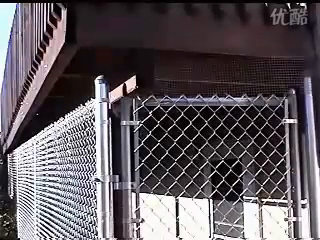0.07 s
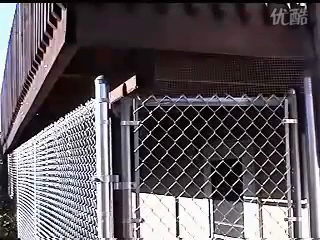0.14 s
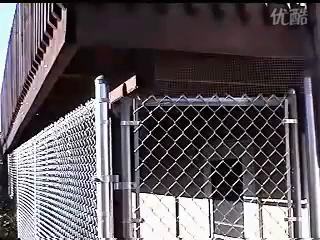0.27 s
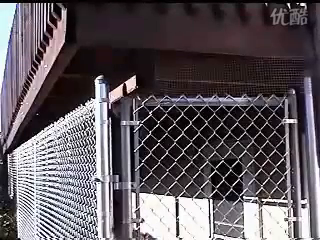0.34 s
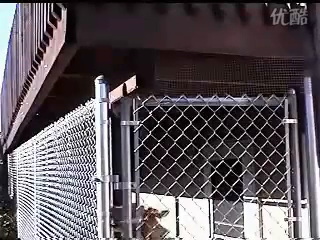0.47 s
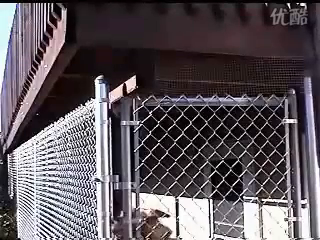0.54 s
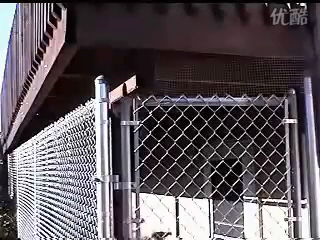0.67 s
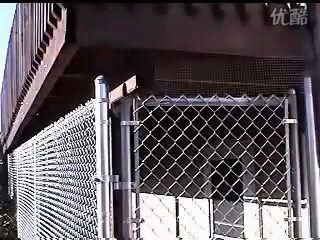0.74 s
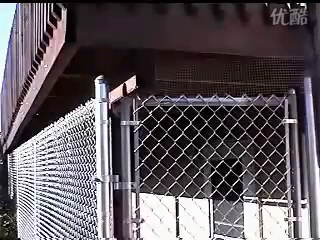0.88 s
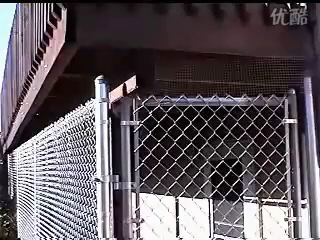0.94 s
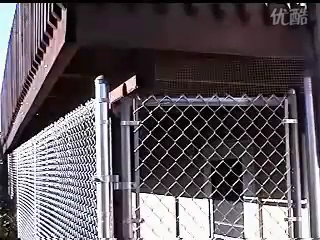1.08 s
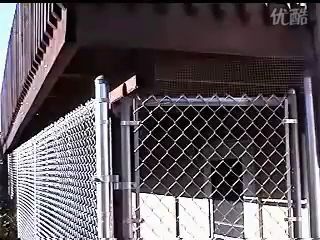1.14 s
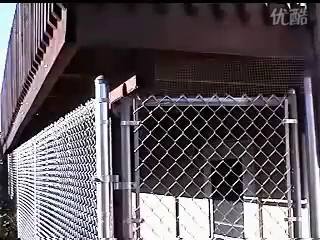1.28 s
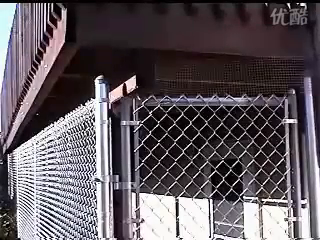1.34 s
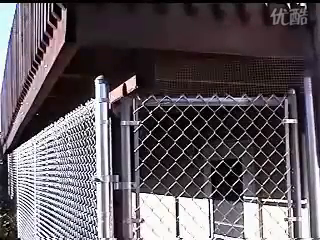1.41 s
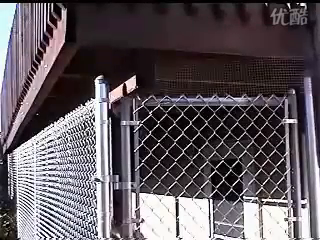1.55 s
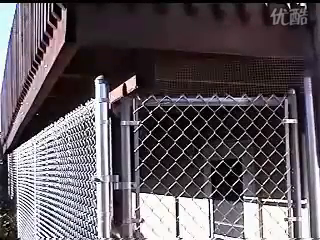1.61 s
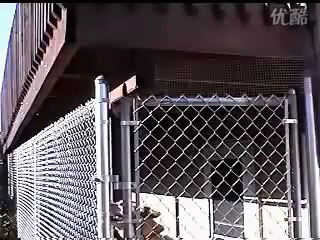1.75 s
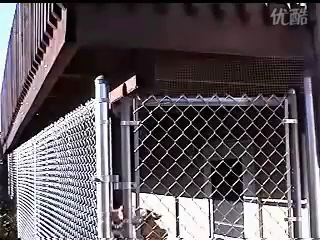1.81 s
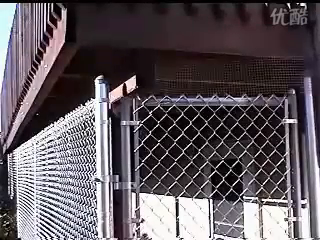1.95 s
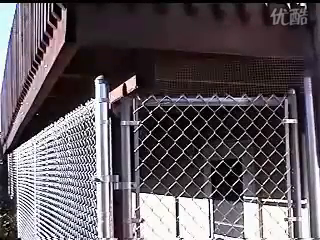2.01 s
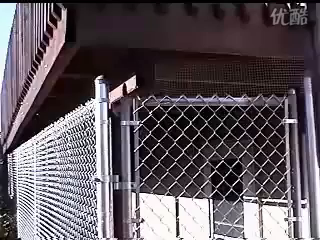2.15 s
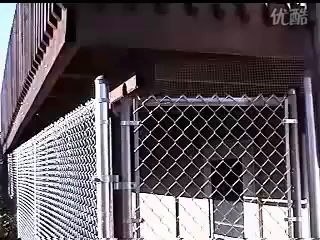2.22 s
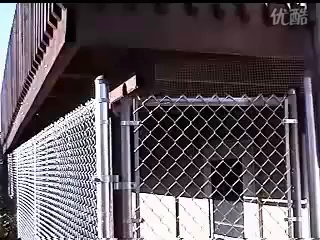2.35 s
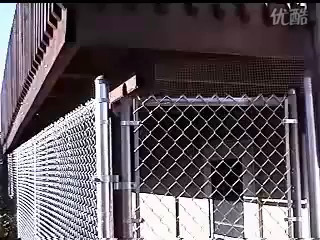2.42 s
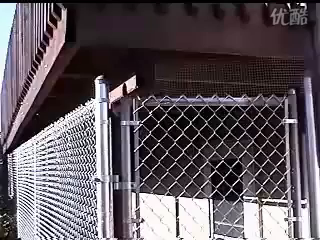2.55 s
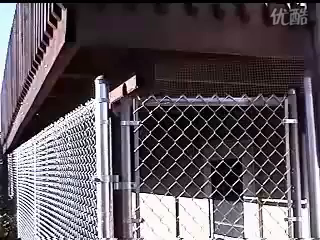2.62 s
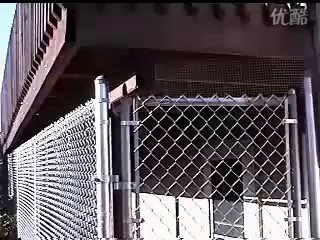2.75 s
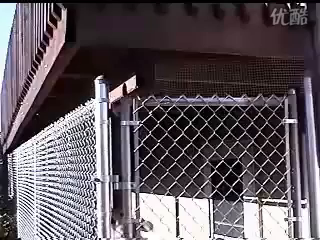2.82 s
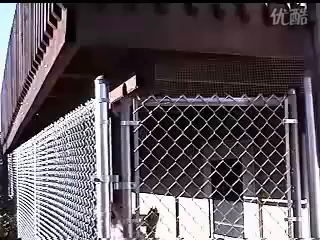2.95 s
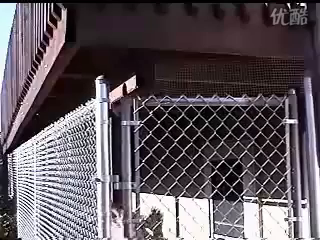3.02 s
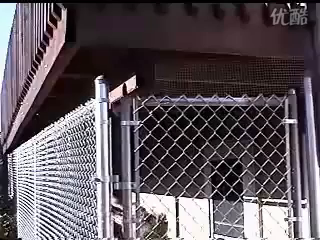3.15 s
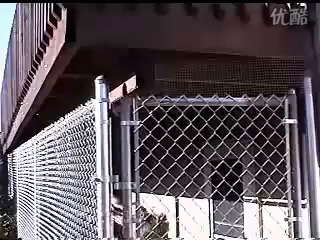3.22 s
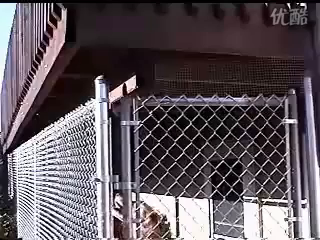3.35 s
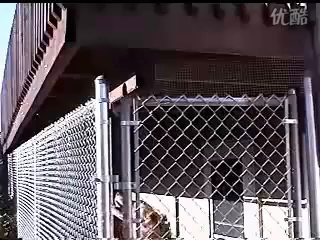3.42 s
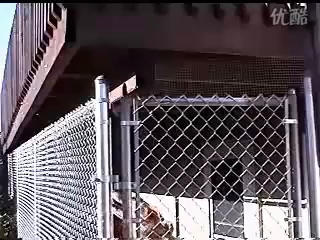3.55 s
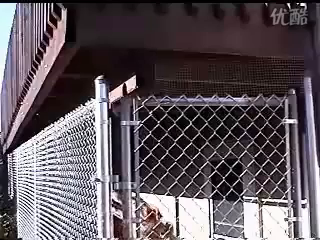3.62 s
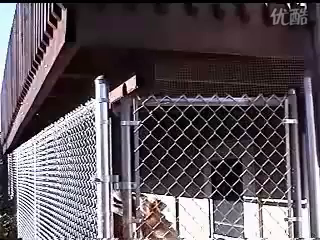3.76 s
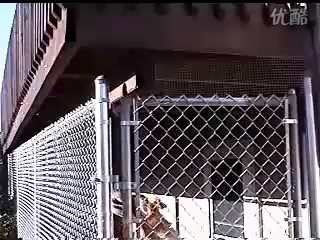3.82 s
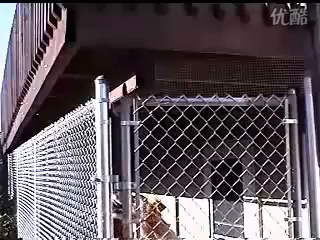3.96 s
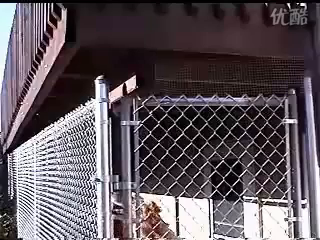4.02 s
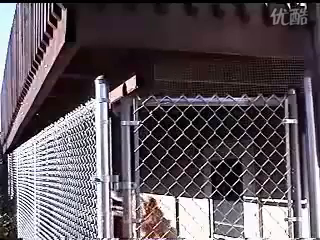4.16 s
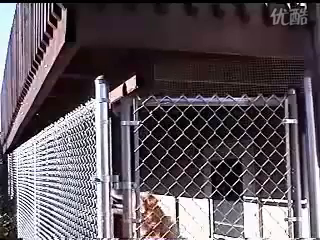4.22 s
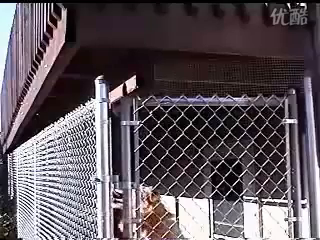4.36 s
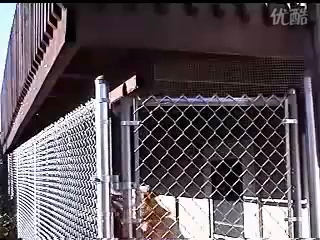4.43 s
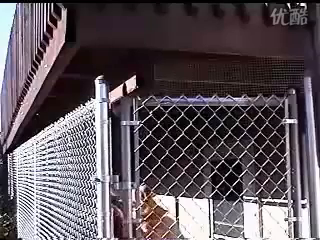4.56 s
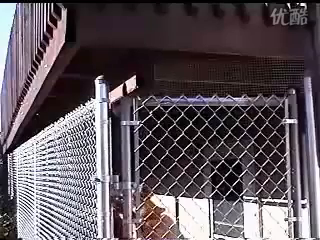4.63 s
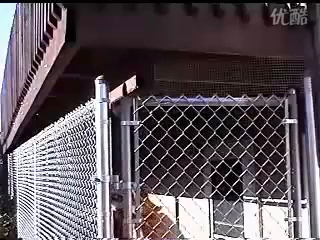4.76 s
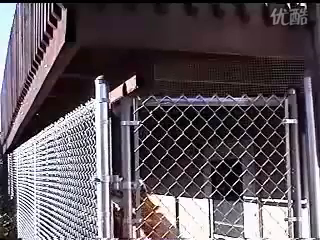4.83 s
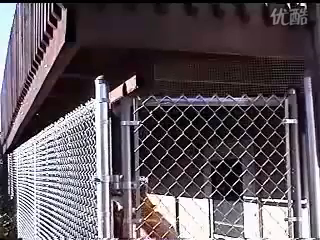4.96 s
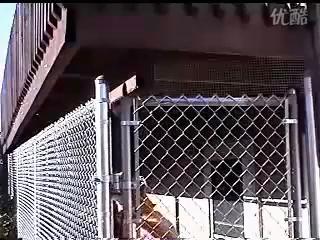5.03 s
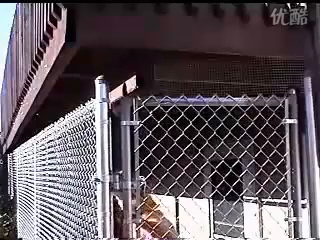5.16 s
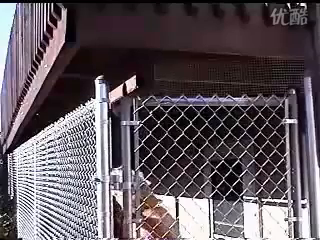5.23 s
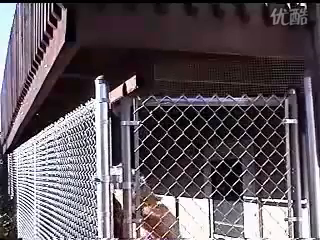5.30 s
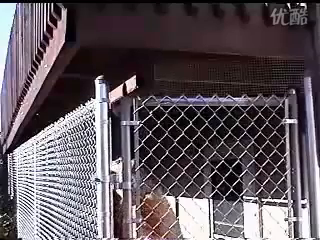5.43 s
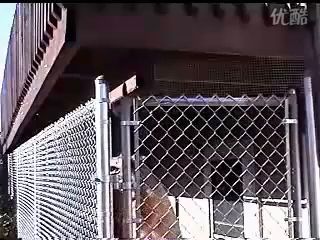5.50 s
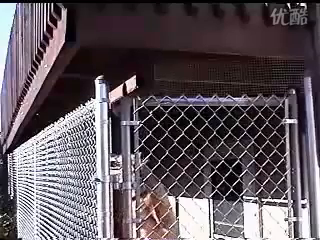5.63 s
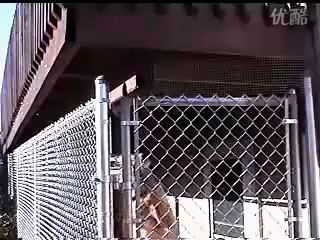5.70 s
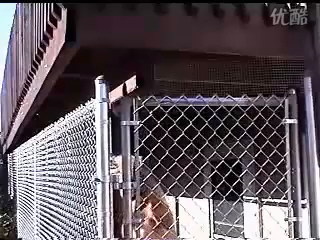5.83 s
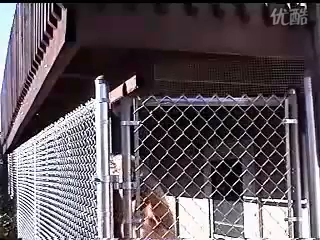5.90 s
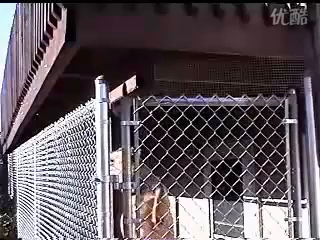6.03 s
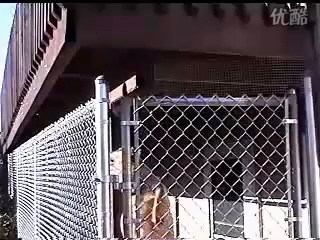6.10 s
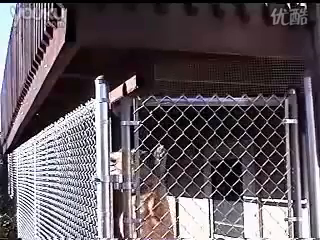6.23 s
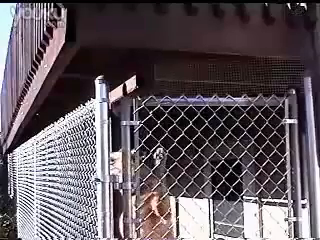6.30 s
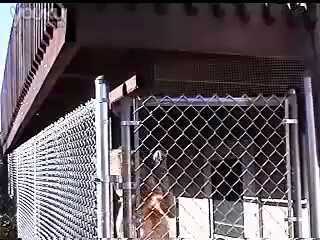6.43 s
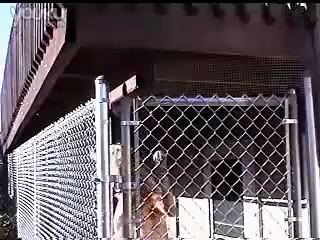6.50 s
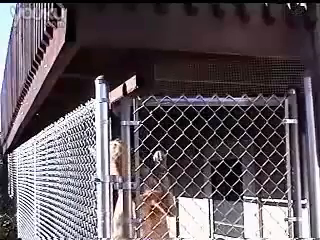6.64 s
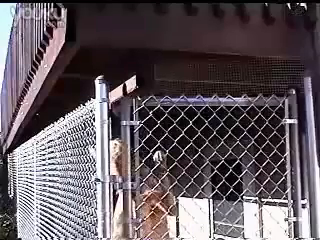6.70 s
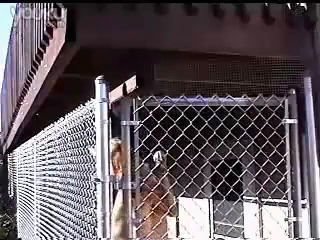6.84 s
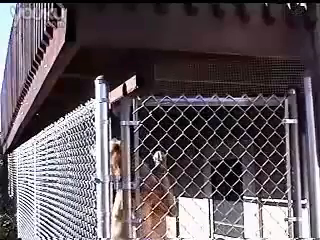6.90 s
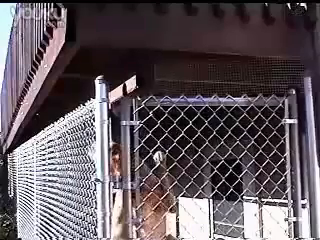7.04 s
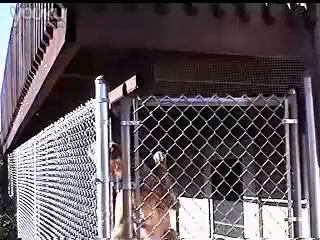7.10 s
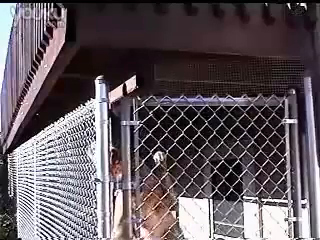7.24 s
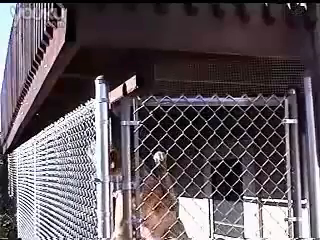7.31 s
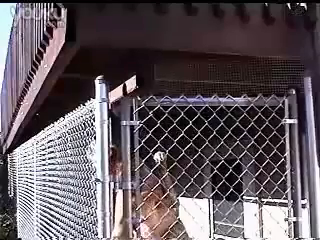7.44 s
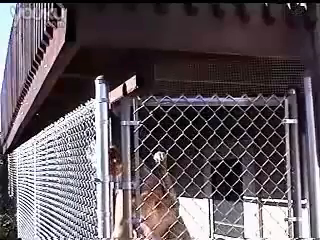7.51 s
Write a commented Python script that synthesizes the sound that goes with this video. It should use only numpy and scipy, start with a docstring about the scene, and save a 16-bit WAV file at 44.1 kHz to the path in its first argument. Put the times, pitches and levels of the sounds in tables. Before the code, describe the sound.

Loose wire mesh jangles in irregular bursts as an animal jumps at and then scrambles up a metal gate in an open-air kennel. Noisy steel crashes carry short metallic rings and occasional gliding knocks through the pipes. Early hits are separated by quieter hiss; later ones overlap in nearly continuous rattling. A rough microphone adds constant hiss, shifting low rumble, dull top end and clipped peaks.

```python
"""A loud hiss runs throughout, drifting a few dB, over a low rumble that swells as the gate shakes.
From 0.2 s a dog climbs a chain-link gate: paw shoves rattle the mesh, a blur of tiny link taps.
From 0.2 s latch, frame and hinge also clank: damped steel modes, each with a noise crash from the wires.
From 1.1 s a few pushes thump through the pipes as short gliding tones; clanks go on to 7.4 s.
The sum is band-limited; its loudest peaks clip."""
import sys
import numpy as np
from scipy import signal
from scipy.fft import rfft, irfft, next_fast_len
from scipy.io import wavfile
from scipy.ndimage import uniform_filter1d, map_coordinates

SR = 44100
rng = np.random.default_rng(int(sys.argv[2]) if len(sys.argv) > 2 else 0)


def generate_wav(signal):
    """Clip the signal to [-1, 1] and save it as 16-bit WAV at the path in sys.argv[1]."""
    frames = np.transpose(np.atleast_2d(signal))
    scaled = np.clip(frames, -1, 1) * 32767
    pcm = np.round(scaled).astype(np.int16)
    wavfile.write(sys.argv[1], SR, pcm)


N = 333837  # samples


def amp(db):
    """Linear gain of a level in dB."""
    return 10 ** (np.asarray(db) / 20)


def unit(x):
    """Scale x to rms 1."""
    return x / np.sqrt(np.mean(x ** 2) + 1e-20)


def along(points, hz):
    """Interpolate (f/Hz, value) points on a log-frequency axis."""
    f, v = np.transpose(points)
    return np.interp(np.log(hz + 1), np.log(f + 1), v)


def curves(rows):
    """Interpolate each column after t/s to one value per sample."""
    s, *cols = np.transpose(rows)
    return [np.interp(np.arange(N) / SR, s, c) for c in cols]


def filtered(x, response):
    """Zero-phase filter: spectrum of x times response(hz)."""
    m = next_fast_len(N + SR // 2)
    return irfft(rfft(x, m) * response(np.fft.rfftfreq(m, 1 / SR)), m)[..., :N]


def stereo(pair, alike):
    """Mix two unrelated signals to left/right with the given correlation per frequency."""
    def mid_side_gains(hz):
        angle = np.arccos(np.clip(along(alike, hz), -1, 1)) / 2
        return np.array([np.cos(angle), np.sin(angle)])
    mid, side = filtered(pair, mid_side_gains)
    return np.array([mid + side, mid - side])


def patchy(pair, patchy_db):
    """Random smooth gain patches over time and frequency, patchy_db rms, shared by both channels."""
    z = signal.stft(pair, nperseg=512)[2]
    field = rng.standard_normal(z.shape[1:])
    field = uniform_filter1d(field, size=5, axis=0)
    field = uniform_filter1d(field, size=8, axis=1)
    return signal.istft(z * amp(patchy_db * unit(field)), nperseg=512)[1][:, :N]


def wobble(rate_hz):
    """Smooth random curve through rate_hz knots per second."""
    knots = rng.standard_normal(int(N * rate_hz / SR) + 4)
    return map_coordinates(knots, [np.arange(N) * rate_hz / SR])


# lasting mesh motion under the dog's weight, relative levels:
# [t/s, rattle level/dB, slack low wires re rattle/dB, tight high links re rattle/dB]
MESH_JIGGLE = [(0, -23, 4, 0), (.17, -22, 3, 0), (.45, -29, 5, -14), (.95, -22, -9, -4), (1.2, -36, 3, -12),
               (1.62, -33, 3, -14), (1.98, -18.5, 5, 2), (2.52, -22.5, 3, 1), (2.88, -27, 0, -5),
               (3.8, -20, 1, 2), (4.42, -27, 6, -1), (4.8, -30, 5, 3), (5.08, -29, 6, -1),
               (5.6, -18, -1, 1), (6.1, -21, -1, 3), (6.95, -17.5, 3.5, 2), (7.15, -20, 1, -3),
               (7.57, -20, 1, -1)]
# paw shoves, relative levels: [peak t/s, peak level/dB, rise over last 20 dB/s, t60/s,
# slack low wires re peak/dB, tight high links re peak/dB]
PAW_SHOVES = [(.21, -6, .03, .75, -15, -7.5), (.61, -4.5, .03, .62, -22, 0), (1.28, -15.5, .03, .9, -3, -2),
              (1.55, -15, .3, .15, -8, -19), (1.73, -9.5, .07, .8, -10, -3),
              (1.83, -4.5, .3, .8, -6.5, -3.5), (2.27, -15, .45, .7, -4, 1.5),
              (2.66, -15, .1, .25, -11, -8), (2.745, -9.5, .06, .45, -.5, -2), (3.02, -8.5, .12, .6, 0, 3),
              (3.16, -5.5, .12, 1.6, 1.5, -1.5), (3.55, -13, .45, 2.4, .4, 1.5),
              (4.02, -6.5, .2, 1.3, -2, -1.5), (4.62, -14.5, .45, .7, 2.5, 5),
              (4.92, -14, .12, .55, -1.5, 2.5), (5.35, -18, .3, 3, -1.5, 0),
              (5.85, -13, .35, 1.1, 1.5, -.5), (6.26, -16, .3, .5, -.5, -6), (6.37, -14, .05, .8, -8, 1.5),
              (6.53, -12, .05, .8, -1.5, -15), (6.64, -10.5, .12, .45, -8, -6),
              (6.83, -12.5, .6, .15, -5, -7), (7.27, -12, .2, 1.2, 3.5, -2.5),
              (7.56, -11, .25, 1.1, -3, -6)]


def shaking():
    """Gains of middle, slack and tight wires: shove powers add to the jiggle power."""
    rattle_db, slack_db, tight_db = curves(MESH_JIGGLE)
    power = amp([rattle_db, rattle_db + slack_db, rattle_db + tight_db]) ** 2
    t = np.arange(N) / SR
    for peak_s, db, rise_s, t60_s, slack_db, tight_db in PAW_SHOVES:
        change_db = np.where(t < peak_s, 20 * (peak_s - t) / rise_s, 60 * (t - peak_s) / t60_s)
        swell = amp(db - change_db)
        power = power + (amp([[0], [slack_db], [tight_db]]) * swell) ** 2
    return np.sqrt(power)


def ticks(count, decay_cycles, size_db):
    """Wire links tap each other: short damped sines at random times, pitches and sizes."""
    when, pitch, size = rng.random((count, 3)).T
    hz = (500 * 16 ** pitch)[:, None]  # 500-8000 Hz
    t = np.arange(120) / SR
    ring = np.sin(2 * np.pi * hz * t) * np.exp(-t * hz / decay_cycles)
    ring *= amp(size_db * np.log(size + .01))[:, None] * hz
    where = (when * N).astype(int)[:, None] + np.arange(120)
    return unit(np.bincount(where.ravel(), ring.ravel())[:N])


# rattle spectrum, relative, also colours the crashes: [f/Hz, level per Hz/dB]
MESH_SPECTRUM = [(120, -40.5), (200, -14), (395, -10), (581, -5), (1240, 1.5), (1450, -1), (1690, 4),
                 (2640, 4), (5380, 0.5), (6680, 3), (7330, 2), (8040, -6), (10500, -31), (17700, -120)]


def mesh():
    """Link taps blur into noise; slack wires carry the low part, tight links the high part."""
    middle_gain, slack_gain, tight_gain = shaking()
    taps = np.array([ticks(count=30000, decay_cycles=2.6, size_db=.5) for _ in range(2)])
    blur = patchy(.5 * taps + rng.standard_normal((2, N)), patchy_db=1.87)
    rattle = filtered(blur, lambda hz: amp(along(MESH_SPECTRUM, hz)))
    under = lambda hz, edge_hz: 1 / (1 + (hz / edge_hz) ** 6)
    slack = filtered(rattle, lambda hz: under(hz, 2060))
    middle = filtered(rattle, lambda hz: under(hz, 4250) - under(hz, 2420))
    tight = filtered(rattle, lambda hz: 1 - under(hz, 4860))
    return amp(-6) * (middle_gain * unit(middle) + slack_gain * unit(slack) + tight_gain * unit(tight))


# steel contacts, relative levels: [t/s, crash level/dB, ring level/dB,
# part struck (0 frame, 1 latch, 2 hinge; fractions share), rise time constant of the crash/s]
STEEL_CONTACTS = [(0.195, 0.5, -21, .1, 0.001), (0.508, -0.5, -5, 1.73, 0.0013),
                  (0.5868, 4.5, -14.5, 1.07, 0.0012), (1.257, -4, -25, .06, 0.001),
                  (1.497, -29, -29, 1.1, 0.008), (1.547, -14.5, -30, .2, 0.0062),
                  (1.6575, -7, -20.5, 1.6, 0.001), (1.6817, 1, -22, .85, 0.001),
                  (1.7225, -15.5, -8.5, 1.98, 0.0045), (1.77, 3.5, -14, 1.98, 0.0093),
                  (1.979, -35, -21.5, .55, 0.008), (2.12, -18.5, -13.5, 1.72, 0.0072),
                  (2.2598, -1.5, -9, 1.9, 0.008), (2.641, -9, -29, 1.05, 0.015),
                  (2.7242, -18, -24, .05, 0.00053), (2.8802, -29, -15, 1.76, 0.001),
                  (2.957, -6, -4.5, 1.83, 0.002), (3.108, -2.5, -20, 1.97, 0.021),
                  (3.47, -5.5, -22, 1.15, 0.014), (3.683, 0.5, -36, .4, 0.008),
                  (3.98, -17, -21, .15, 0.008), (4.03, 4, -24.5, .17, 0.013),
                  (4.13, -2.5, -19, .68, 0.0051), (4.218, -5, -26, .08, 0.0074),
                  (4.519, -5, -30, .07, 0.0087), (4.6233, 1.5, -30, .06, 0.008),
                  (4.833, -5, -10, 1.96, 0.0025), (4.9057, 1.5, -10, 1.84, 0.009),
                  (5.209, -12, -26, 1.87, 0.0043), (5.3136, -3, -33.5, 1.84, 0.0006),
                  (5.8473, 1, -26, .63, 0.012), (5.888, -0.5, -18.5, .08, 0.014),
                  (5.9579, -5.5, -26, .82, 0.008), (6.2148, 3.5, -41, .47, 0.017),
                  (6.3634, 2.5, -29.5, .87, 0.0089), (6.5206, -9, -34.5, .8, 0.008),
                  (6.5979, 2, -31, 1.26, 0.0071), (6.8503, -9.5, -27.5, .85, 0.001),
                  (6.95, -21, -14, 1.72, 0.01), (7.1796, -1.5, -19, 1.37, 0.001),
                  (7.241, 1, -17.5, 1.41, 0.008), (7.449, 0.5, -14, 1.76, 0.0022)]
# modes of frame, latch, hinge, one list each, relative: [f/Hz, level/dB, t60/s]
STEEL_MODES = [
    [(2560, -8, 0.73), (2780, -6, .5), (2768, -2.5, .3)],
    [(3405, -5, .6), (3774, -11, .2), (4600, -14, .4), (5250, -18, .3)],
    [(6230, -12, 0.17), (6330, -20.5, 0.093), (6700, -8, 0.15), (6470, -15, 0.18), (7380, -20, 0.082)],
]


def clanks():
    """Each contact rings steel modes with wandering phase and shakes a noise crash out of the wires."""
    rings, crash = np.zeros((2, N + SR)), np.zeros((2, N + SR))
    t = np.arange(SR * 3 // 10) / SR
    for start_s, crash_db, ring_db, part, rise_s in STEEL_CONTACTS:
        at = slice(round(start_s * SR), round(start_s * SR) + len(t))
        ring_onset = 1 - np.exp(-t / (rise_s + .0033))
        for k, modes in enumerate(STEEL_MODES):
            hz, db, t60_s = np.transpose(modes)[:, :, None]
            steps_rad = .083 * rng.standard_normal((len(modes), len(t)))
            phase = 2 * np.pi * hz * t + np.cumsum(steps_rad, axis=1)
            ring = (amp(db - 60 * t / t60_s) * np.exp(1j * phase)).sum(axis=0)
            share = max(0, 1 - abs(part - k))
            # left and right in quadrature
            rings[:, at] += amp(ring_db + 14.5) * share * ring_onset * [ring.imag, ring.real]
        decay = amp(-60 * t / .043) + .65 * amp(-60 * t / (12 * rise_s))
        fade = decay * (1 - np.exp(-t / rise_s))
        crash[:, at] += amp(crash_db + .5) * fade * rng.standard_normal((2, len(t)))
    bright = lambda hz: amp(along(MESH_SPECTRUM, hz) + 3) * hz ** 2 / (hz ** 2 + 2300 ** 2)
    return rings[:, :N] + filtered(crash[:, :N], bright)


# pushes along the pipes, level before the onset ramp:
# [t/s, level/dB, first f/Hz, last f/Hz, t60/s, rms pitch waver/fraction]
PIPE_PUSHES = [(1.131, -11, 1670, 1630, 0.1, 0.06), (1.144, -3, 934, 892, 0.065, 0.09),
               (1.545, -9.5, 975, 890, 0.081, 0.25), (1.802, -11, 1741, 1635, 0.44, 0.01),
               (2.722, -1.5, 1050, 656, 0.06, .25), (2.735, -3, 1000, 720, .08, .3),
               (2.743, -5, 988, 1252, 0.14, 0.2), (2.755, 0.5, 502, 460, 0.07, 0.3),
               (3.257, -1.5, 1400, 1180, 0.061, 0.3), (5.312, -6.5, 1985, 2080, 0.073, 0),
               (6.847, 0, 2250, 2500, 0.045, .15), (6.848, 1.5, 1500, 900, 0.09, .25),
               (6.858, -2, 800, 420, .09, .3), (7.235, -9, 560, 420, .12, .4),
               (7.303, -12, 384, 320, 0.17, 0.42)]
GLIDE_S = .009  # time constant towards last f


def thumps():
    """Bending waves in a pipe disperse, so a push glides in pitch; loose joints roughen it."""
    out, t = np.zeros((2, N + SR)), np.arange(SR // 6) / SR
    for start_s, db, first_hz, last_hz, t60_s, rough in PIPE_PUSHES:
        hz = last_hz + (first_hz - last_hz) * np.exp(-t / GLIDE_S)
        waver = 1 + rough * unit(uniform_filter1d(rng.standard_normal((2, len(t))), size=60))
        tone = np.sin(2 * np.pi * np.cumsum(hz * waver, axis=1) / SR)
        envelope = amp(db - 60 * t / t60_s) * (1 - np.exp(-t / .0017))
        out[:, round(start_s * SR):][:, :len(t)] += envelope * tone
    return filtered(out[:, :N], lambda hz: hz ** 4 / (hz ** 4 + 250 ** 4))  # thin pipes radiate no bass


# hiss course, relative: [t/s, level/dB]
HISS_LEVEL = [(0, -21.5), (.44, -21.5), (2.5, -23), (4.58, -25), (5.23, -20), (7.57, -25)]
# hiss spectrum, relative: [f/Hz, level per Hz/dB]
HISS_SPECTRUM = [(100, -56), (160, -17.5), (350, -5), (730, -5.5), (1080, -6.5), (1700, -11), (2000, -13),
                 (3500, -13.5), (5000, -19.5), (6800, -18), (7600, -27.5), (7800, -47.5), (9000, -81)]
# hiss left-right correlation: [f/Hz, correlation/-1..1]
HISS_ALIKE = [(150, -0.75), (260, -0.25), (480, 0.47), (950, 0.58), (1900, 0.93), (3800, 0.47),
              (7590, 0.87)]


def hiss():
    """Broad patchy noise, its bass partly opposite left to right."""
    noise = patchy(rng.standard_normal((2, N)), patchy_db=2.5)
    coloured = filtered(noise, lambda hz: amp(along(HISS_SPECTRUM, hz)))
    return amp(curves(HISS_LEVEL)[0] + 2.1) * unit(stereo(coloured, HISS_ALIKE))


# rumble spectrum, relative: [f/Hz, level per Hz/dB]
RUMBLE_SPECTRUM = [(15, -19.5), (30, -6), (125, -1.2), (175, -13), (260, -24.5), (500, -85)]
RUMBLE_DB, RUMBLE_GROWS = -30, .85  # mean level at shaking gain 1; dB per dB of shaking


def rumble():
    """Lumpy low noise, mostly opposite left to right, that swells when the gate shakes."""
    noise = filtered(rng.standard_normal((2, N)), lambda hz: amp(along(RUMBLE_SPECTRUM, hz)))
    wide = unit(stereo(noise, [(30, -.2), (60, -.85), (200, -.85)]))  # f/Hz, correlation
    return amp(RUMBLE_DB + 4 * wobble(rate_hz=4)) * shaking()[0] ** RUMBLE_GROWS * wide


# gate left-right correlation: [f/Hz, correlation/-1..1]
GATE_ALIKE_BY_HZ = [(130, 0.87), (280, 0.99), (670, 1), (1200, 1), (2260, 0.94), (7590, 0.77)]


def scene():
    """Sum gate, hiss and rumble; gate and hiss lean a little to the right."""
    gate = stereo(mesh() + clanks() + thumps(), GATE_ALIKE_BY_HZ)
    return gate * amp([[-.3], [.3]]) + hiss() * amp([[-.8], [.8]]) + rumble()


BAND_HZ, TOP_HZ = 8300, 15750  # cutoffs before and after clipping


def record(dry):
    """Band-limit with a small step down near the edge, then clip, which splatters above the band."""
    band = filtered(dry, lambda hz: np.where(hz < 7650, 1, amp(-2.5)) * (hz < BAND_HZ))
    clipped = np.clip(band, -.94, .94)
    return filtered(clipped, lambda hz: hz < TOP_HZ)


dry = scene()
out = record(dry)
generate_wav(out)
```